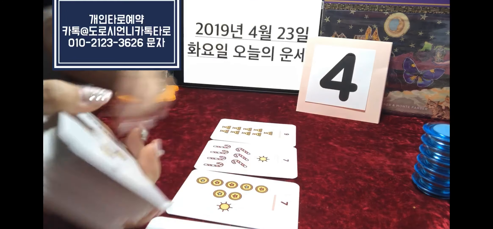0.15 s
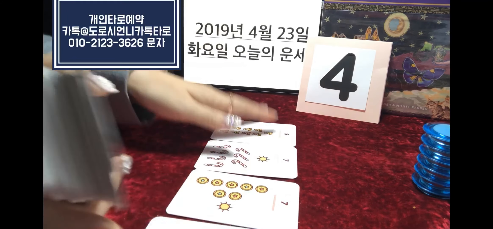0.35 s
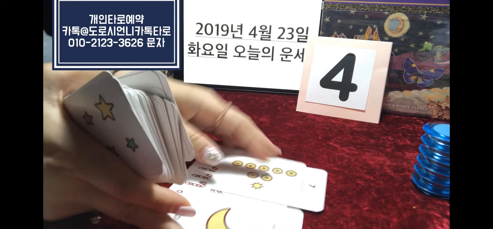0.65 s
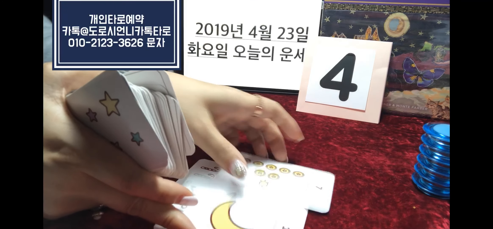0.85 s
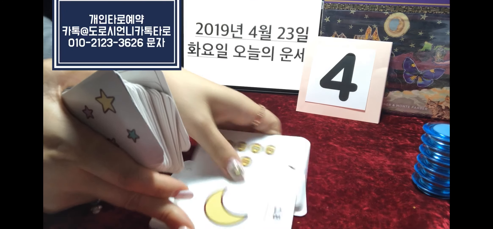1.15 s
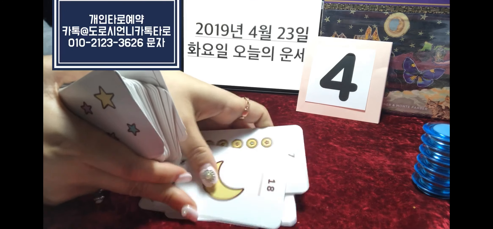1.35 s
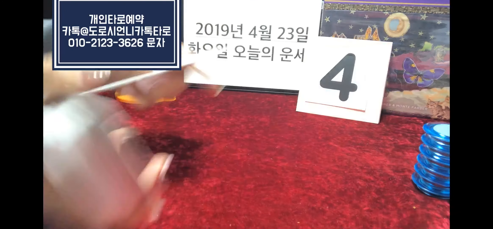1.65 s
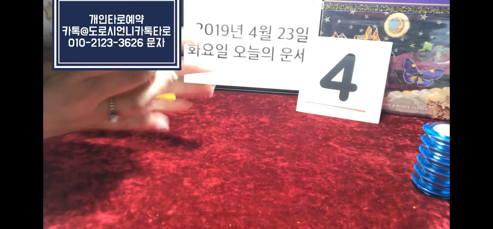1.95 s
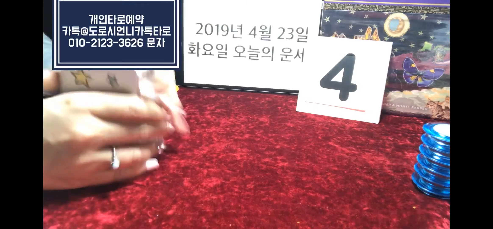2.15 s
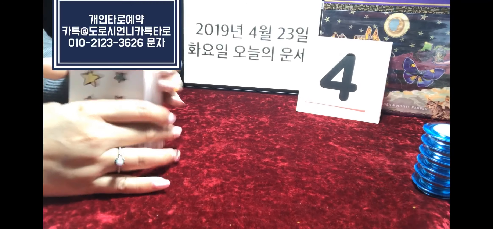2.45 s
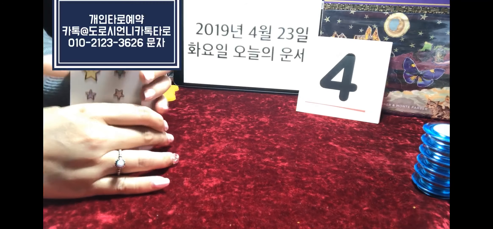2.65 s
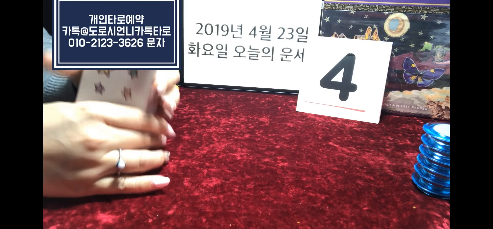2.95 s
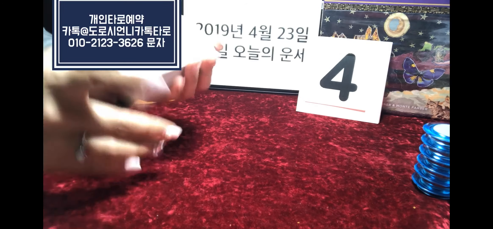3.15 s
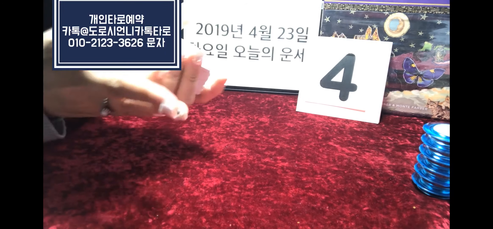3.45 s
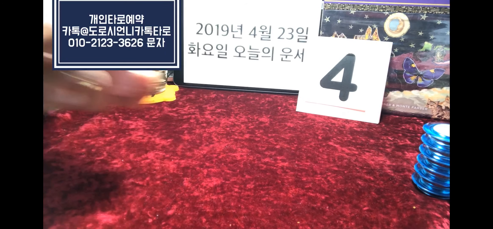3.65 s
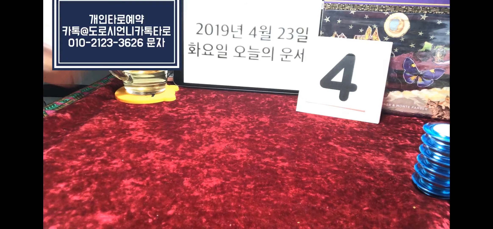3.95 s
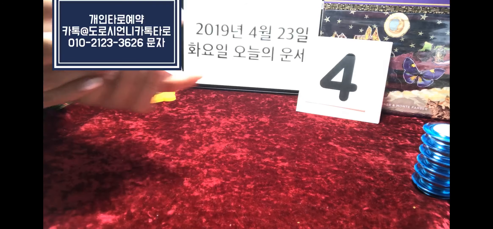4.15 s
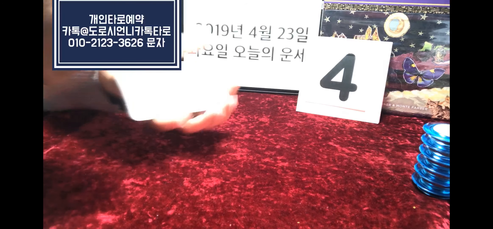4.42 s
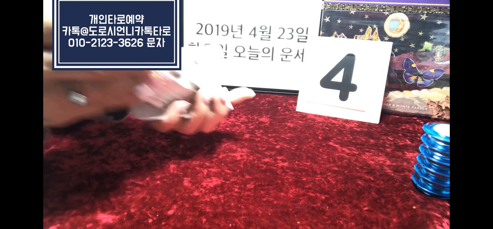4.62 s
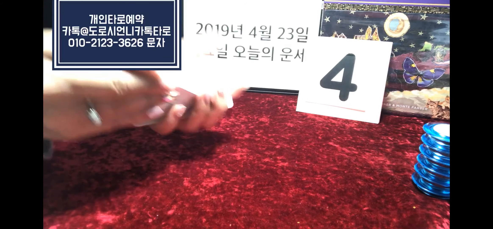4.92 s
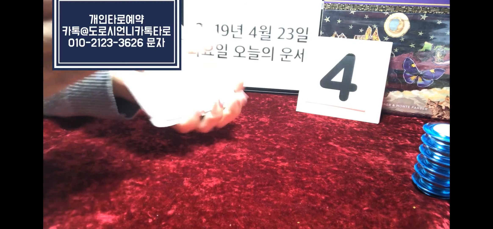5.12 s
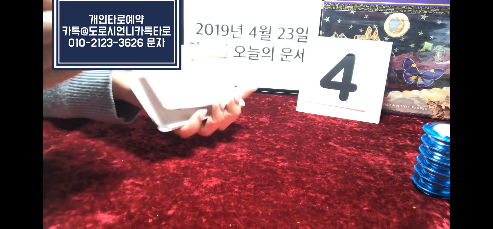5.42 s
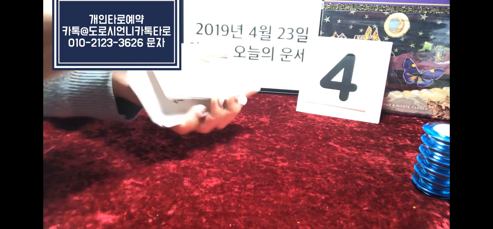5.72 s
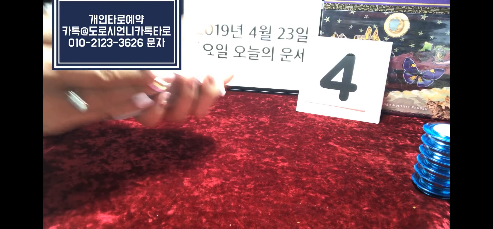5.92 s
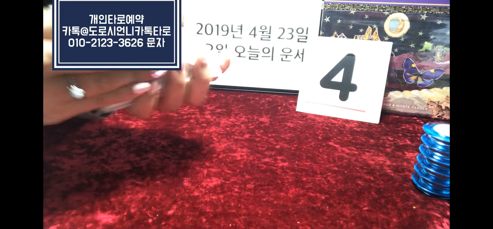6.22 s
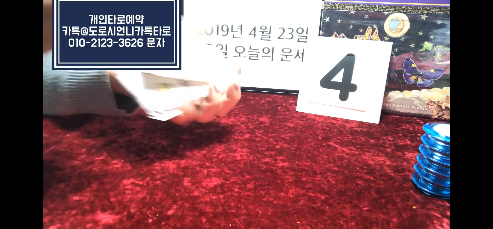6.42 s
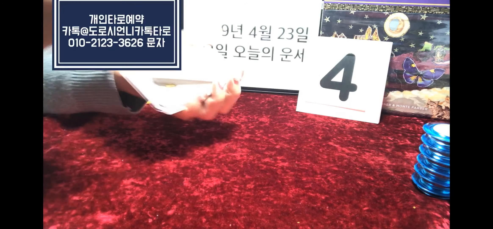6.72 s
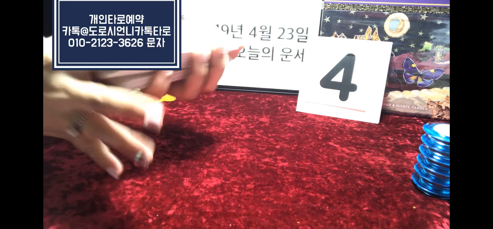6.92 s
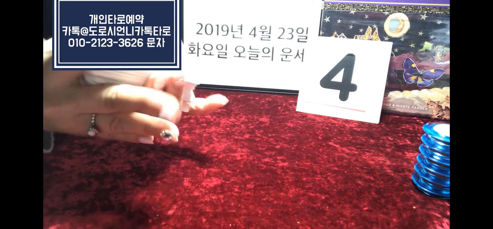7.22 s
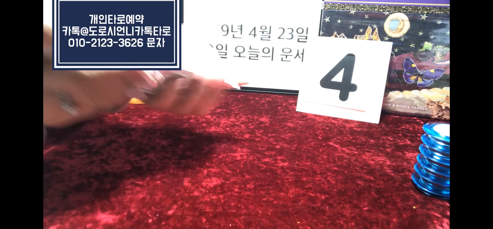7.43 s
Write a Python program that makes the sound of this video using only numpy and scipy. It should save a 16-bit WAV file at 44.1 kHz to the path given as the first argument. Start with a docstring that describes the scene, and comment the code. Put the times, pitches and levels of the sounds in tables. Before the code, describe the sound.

Close and dry, in a small quiet room with soft air and a faint low hum. At about 0.1 s a bright, hard card snap is followed by a tiny singing scrape and a hollow pop. From 0.5 to 1.1 s come light ticks, short slides and soft table bumps, with a quick bright swish at 1.04. Between 1.2 and 2.0 s cards are gathered with longer papery friction, crisp clicks near 1.58 and 1.86, and dull cloth rumble. Firm, woody knocks cluster at 2.15 s, loudest here, and again at 2.4, then softer thuds at 2.8 and 3.1. Faint rubbing fades into near silence until 4.6 s. Then eight overhand shuffle strokes land about every third of a second, the last at 6.9: brushy rush, hollow slap with softer rebound, sliding, light lifting tick. Strokes around 5.3 to 5.7 s are strongest. Only a faint slide remains near 7.5 s.

```python
"""Tarot cards gathered from a cloth-covered table, knocked on it, then shuffled overhand, all close by.
Cards: snapping edges and hollow pops are filtered impulses with dying noise; friction is grainy noise.
Eight shuffle strokes: a packet rushes in, lands, slides out and lifts clear with a tick of its edges.
Table: blows ring decaying modes, hands rumble on the cloth. Room echoes, still air and a low hum."""
import sys
import numpy as np
from scipy import signal
from scipy.fft import rfft, irfft
from scipy.io import wavfile
from scipy.ndimage import uniform_filter1d

SR = 44100
rng = np.random.default_rng(int(sys.argv[2]) if len(sys.argv) > 2 else 0)


def wav_out(sig):
    """Save sig, one row per channel (or a flat mono array), as 16-bit PCM at SR to the path in sys.argv[1]."""
    wavfile.write(sys.argv[1], SR, np.round(np.clip(np.atleast_2d(sig).T, -1, 1) * 32767).astype(np.int16))


N = 334278
TAPS = 8192
TIME_S, AGE_S, BINS_HZ = np.arange(N) / SR, np.arange(TAPS) / SR, np.fft.rfftfreq(TAPS, 1 / SR)

# Event levels precede the deck colour, layer gains, room and microphone; spectra are relative.
# still room air: freq_hz, gain_db
AIR_SPECTRUM = [(25, -26), (50, -19.5), (85, -17.5), (280, -18.5), (450, -21), (1300, -31.5), (3600, -35.5),
                (16000, -46)]
# card faces slide over each other: fastest_s, rise_s, fade_s, level_db, brightness_db_per_octave
SLIDES = [(.03, .025, 0.15, -58.5, -2), (.16, .05, 0.11, -59, -5.5), (.503, 0.018, 0.041, -54.5, 0),
          (.58, 0.062, 0.16, -55, 0.5), (.794, 0.075, 0.028, -54.5, -2.5), (.985, .015, 0.058, -59.5, -1.5),
          (1.038, 0.011, 0.021, -35, -2), (1.11, 0.088, 0.16, -51.5, -2.5), (1.386, 0.3, .18, -47.5, -3),
          (1.385, 0.044, .06, -49, -6), (1.58, 0.36, 0.12, -51.5, -1), (1.815, 0.079, 0.1, -49, -2),
          (2.054, .12, .12, -55, 0.5), (2.156, .012, .06, -45, -5), (2.169, 0.045, .11, -51.5, 5.5),
          (2.243, .04, 0.042, -54, 1.5), (2.41, 0.0105, 0.1, -54.5, 1.5), (2.57, 0.018, 0.13, -68.5, 0),
          (2.79, .02, 0.24, -71.5, 1), (3.167, 0.046, 0.24, -60.5, -3.8), (4.335, .11, 0.019, -55.5, 1.5),
          (4.501, 0.011, 0.04, -62, -0.5), (4.7, 0.045, 0.12, -55.5, -2), (4.83, 0.11, 0.18, -63, -4.5),
          (5.118, .05, .045, -49, 3.5), (5.457, .055, 0.024, -38, 9.5), (5.569, 0.071, 0.029, -52.5, -2),
          (6.841, .03, 0.046, -59.5, -1.5), (6.948, 0.0226, 0.026, -41.5, 2),
          (7.124, 0.021, 0.16, -54.5, 2), (7.552, 0.23, 0.027, -56.5, 2)]
# colour of face friction: freq_hz, gain_db
FACE_SPECTRUM = [(70, -5.5), (220, -2.5), (700, -4.5), (1080, -5.5), (1500, -3.5), (3200, -1.5),
                 (4400, 0.5), (6000, -4.5), (7500, -4.5), (9500, -10), (15500, -14)]
# colour of a card edge: freq_hz, gain_db
EDGE_SPECTRUM = [(150, -15.5), (500, -8.5), (1000, -9), (1550, 3.5), (2100, -3.5), (2700, 0.5), (3200, 1),
                 (3700, 4), (5300, 0.5), (6600, -4.5), (7600, -7), (10000, -18), (15500, -21.5)]
# card picked up or put down, its edge snaps and its face pushes out air:
# start_s, snap_db, brightness_db_per_octave, pop_db, pop_hz
CONTACTS = [(0.0886, -29.5, -0.5, -31, 760), (0.1062, -14.5, 2.5, -33, 798),
            (0.1478, -43, -6, -27.5, 528.7), (.266, -57.5, -3.5, -68, 700), (.4103, -55, -1, -60, 700),
            (0.4864, -55, -1, -73, 700), (0.5707, -33.5, 5, -68, 800), (.6467, -40.5, -2, -63, 700),
            (0.6521, -28, 1.5, -54, 760), (.802, -48.5, -3, -58, 450), (.873, -41, -1.5, -48, 680),
            (0.9697, -39, 4, -36.5, 800), (1.0506, -31.5, 1.2, -44, 770), (1.2269, -48, -4, -70, 600),
            (1.3695, -39, 12, -58, 450), (1.386, -43, -8, -48, 420), (1.4463, -43.5, -7.5, -54, 400),
            (1.574, -29, 8, -57, 700), (1.5835, -28.5, 7.5, -45.5, 530), (1.7145, -55.5, -3, -48, 665),
            (1.7881, -39.5, 2, -45.5, 368.6), (1.8507, -29, -3.5, -37, 674), (1.8667, -29, 3.5, -42.5, 585),
            (1.876, -34, 3.5, -37, 750), (2.001, -54, -8, -56, 600), (2.147, -49, -6, -34, 1234),
            (2.6454, -54.5, 8, -62, 500), (3.388, -50.5, 3.5, -61, 710), (4.8314, -72, -4, -50.5, 360),
            (4.9048, -44, 4.5, -51, 600), (5.2224, -55, -1, -51.5, 660), (5.557, -44.5, 3.5, -46.5, 614),
            (5.8193, -49.5, -9, -56, 700), (6.1082, -56, -7, -47, 300), (6.1352, -42, 2, -45.5, 490),
            (6.5595, -43.5, 2.5, -59, 600), (6.59, -44, -1, -54, 600), (6.6029, -30, -1, -40.5, 666),
            (6.6929, -43, 1, -53.5, 550), (6.812, -55, -3, -67, 603)]
# pop around its centre: frequency_ratio, gain_db
POP_SPECTRUM = [(.08, -25.5), (.25, -8.5), (.55, -1.5), (1, 3.5), (1.6, -1), (2.8, -21), (6, -42),
                (20, -62)]
# resonances of a card scraped off the table: center_hz, half_width_hz, gain_db
SCRAPE_MODES = [(1500, 900, -10), (2680, 280, -1.5), (3620, 280, -1.5), (5360, 2500, -0.5),
                (7110, 600, -9.5), (301.3, 82, -3.5)]
# course of the scrape: time_s, level_db
SCRAPE_LEVEL = [(.107, -41.5), (.111, -33), (.124, -36), (.132, -36), (.141, -33), (.148, -38.5),
                (.16, -45.5)]
# hands drag and press on the cloth: hardest_s, rise_s, fade_s, level_db
DRAGS = [(.2, .08, 0.097, -55.5), (.83, 0.13, .2, -51.5), (1.38, 0.14, 0.25, -46), (2.55, 0.5, .35, -60),
         (3.17, 0.086, 0.15, -53), (4.83, .25, .25, -57)]
# table under the hands: freq_hz, gain_db
CLOTH_SPECTRUM = [(50, -26.5), (100, -4.5), (150, 4), (220, -6), (330, -3), (600, -23), (1500, -28.5),
                  (4000, -45)]
# deck or hand meets the table, harder blows have a higher corner: start_s, level_db, corner_hz
KNOCKS = [(.502, -46, 198), (.973, -36.5, 340), (1.051, -33.5, 292), (1.509, -50, 285), (1.639, -51, 200),
          (2.135, -32, 380), (2.155, -18.5, 756), (2.172, -22, 640), (2.193, -29.5, 626),
          (2.245, -41.5, 313), (2.397, -28, 480), (2.413, -23.5, 540), (2.646, -48, 160),
          (2.795, -30.5, 200), (3.079, -41.5, 282)]
# modes of the table: freq_hz, gain_db, t60_s
TABLE_MODES = [(89.9, -21.5, 0.056), (121.2, 3, 0.13), (186.3, -10.5, 0.2), (260, -14, 0.072),
               (286, -1.5, 0.072), (392, -12.5, 0.084), (489.4, 4, 0.072), (533.5, -3.5, .1),
               (612, -0.5, 0.053), (714, 1.5, 0.097), (770, -5, 0.099), (942, -13, .05), (1142, -7, 0.11),
               (1360, -3, 0.077)]
# dull push of a blow on the table top: freq_hz, gain_db
PUSH_SPECTRUM = [(40, -31.5), (75, -8), (120, 1.5), (230, -8), (290, 0), (410, -13.5), (520, -0.5),
                 (950, -12), (1600, -5), (3000, -17.5)]
# overhand strokes: landing_s, rush_lead_s, rush_db, snap_db, brightness_db_per_octave,
# pop_db, pop_hz, draw_length_s, draw_db, lift_s, lift_db
STROKES = [(4.61, .006, -41, -29, 1, -33.5, 855, .01, -52.5, 4.803, -49.5),
           (4.962, .002, -36.5, -31, -4.5, -31, 490, 0.11, -54.5, 5.1676, -38),
           (5.325, .0085, -33, -23.5, 2, -23.5, 675, 0.063, -50, 5.5009, -35),
           (5.6573, 0.0038, -29.5, -21, -2, -26, 750, 0.079, -53.5, 5.8815, -45),
           (5.9715, .008, -31.5, -30, -6, -28, 515, 0.075, -51.5, 6.1672, -36.5),
           (6.2892, .007, -35, -29.5, 0.5, -28.5, 694, .07, -52, 6.454, -37),
           (6.6133, .011, -37.5, -30, -1, -34.5, 478, 0.028, -52, 6.762, -43),
           (6.9224, .013, -38.5, -28, 1, -31, 505, 0.006, -68.5, 7.0043, -53)]
# colour of the edges in a rush: freq_hz, gain_db
BRUSH_SPECTRUM = [(150, 5.5), (500, 5.5), (900, -1.5), (1700, -1), (2800, -3), (4500, -1), (7300, -7.5),
                  (9500, -11), (15500, -14)]
# fixed bands lifted in every card sound: center_hz, half_width_hz, boost_db
CARD_BANDS = [(362.2, 45, 2.5), (717.3, 17, 3.5), (850, 70, 3.5), (1460, 130, 3.5), (2170, 37, 0.5),
              (3650, 350, -1.5)]
# decay of the small room: freq_hz, t60_s
ROOM_DECAY = [(100, 0.32), (500, 0.18), (3000, 0.31), (8000, 0.22), (16000, 0.16)]

AIR_DB = -67.5
SWELL_DB = 20  # span of one rise or fade
# a harder snap is more of a single crack: dB less shiver per dB above the threshold
CRACK_FROM_DB, CRACK_SHARPENING = -26.5, 0.6
# a hard blow claps the cards together: level re blow, pop per corner, corner below which it fades
CLAP_DB, CLAP_PITCH_RATIO, CLAP_HARD_HZ, CLAP_DELAY_S = -4.5, 1.25, 380, .0025
RUSH_OVERLAP_S = .011  # edges keep brushing after the landing
# the far end lands later, softer and duller
REBOUND_S, REBOUND_DB, REBOUND_PITCH_RATIO, REBOUND_DB_PER_OCTAVE = 0.0082, -9, 0.71, -5
SETTLE_DB, SETTLE_S, SETTLE_FADE_S = -13, 0.013, .05  # packet beds in; level re rush
# thumb pulls cards off
DRAW_DELAY_S, DRAW_RISE_S, DRAW_FADE_S, DRAW_DB_PER_OCTAVE = 0.072, .09, 0.053, 2.6
GRIP_DELAY_S, GRIP_DB, GRIP_HZ = .105, -57.5, 520  # fingers close on the packet
LIFT_DB_PER_OCTAVE, LIFT_POP_DB, LIFT_POP_HZ = 0.44, -5, 575  # pop level re lift tick
CUT_HZ = 16000


def amp(db):
    """Decibels to gain."""
    return 10 ** (np.asarray(db) / 20)


def unit(x):
    """Scales to rms 1."""
    return x / np.sqrt(np.mean(x ** 2) + 1e-20)


def at_level(x, db, size):
    """Sets the rms of the first size samples."""
    return amp(db) * x / np.sqrt(np.mean(x[:size] ** 2))


def read(points, hz):
    """Joins points by straight lines over log frequency."""
    point_hz, value = np.transpose(points)
    return np.interp(np.log(hz + 1), np.log(point_hz), value)


def octaves(hz):
    """Distance from the middle of the cards' range, for tilting a colour."""
    return np.log2(np.clip(hz, 700, 11000) / 3800)


def add(mix, start_s, sound):
    """Mixes a sound in at start_s."""
    part = mix[max(round(start_s * SR), 0):][:len(sound)]
    part += sound[:len(part)]


def colour(x, gain_db):
    """Minimum-phase filter with gain_db over BINS_HZ, peak gain normalized to 0 dB."""
    log_gain = np.log(amp(np.maximum(gain_db - gain_db.max(), -90)))
    mirrored = np.r_[log_gain, log_gain[-2:0:-1]]
    spectrum = np.exp(signal.hilbert(mirrored).conj())
    return signal.fftconvolve(x, np.fft.ifft(spectrum).real)[:len(x)]


def ripple(spacing_hz):
    """Random spectral peaks and dips: a card bends differently in every grip."""
    knots_hz = np.arange(0, SR / 2 + spacing_hz, spacing_hz)
    return np.interp(BINS_HZ, knots_hz, rng.standard_normal(TAPS)[:len(knots_hz)])


def patches(z, bin_count, frame_count):
    """Random blotches of rms 1 over frequency and time."""
    blotches = uniform_filter1d(rng.standard_normal(z.shape), bin_count, axis=0)
    return unit(uniform_filter1d(blotches, frame_count, axis=1))


def blow(t60_s, scatter_db):
    """One impulse plus a dying scatter of small contacts."""
    x = rng.standard_normal(TAPS) * amp(-60 * AGE_S / t60_s)
    x *= amp(scatter_db) / np.linalg.norm(x)
    x[0] += 1
    return x


def grains(size, per_s, spread_db, hiss):
    """Paper fibres catch and let go: clicks of uneven size over a fine hiss."""
    sizes_db = spread_db * np.minimum(rng.exponential(1, size), 4)
    catches = (rng.random(size) < per_s / SR) * amp(sizes_db)
    clicks = unit(catches * rng.choice([-1, 1], size))
    return unit(clicks + hiss * rng.standard_normal(size))


def swell(peak_s, rise_s, fade_s, level_db, hold_s=0):
    """Power of a hand movement that gathers speed until peak_s, holds, and dies away."""
    before = np.maximum(peak_s - TIME_S, 0) / rise_s
    after = np.maximum(TIME_S - peak_s - hold_s, 0) / fade_s
    return amp(level_db - SWELL_DB * np.minimum(before + after, 10)) ** 2


def background():
    """Still room air as shaped noise; low appliance hum as a sine with drifting phase."""
    hz = np.fft.rfftfreq(N, 1 / SR)
    z = rfft(rng.standard_normal(N)) * amp(read(AIR_SPECTRUM, hz))
    air = irfft(z, N) / np.std(irfft(z * (hz > 100), N))  # rms 1 above 100 Hz
    drift = unit(irfft(rfft(rng.standard_normal(N)) * np.exp(-(hz / 3) ** 2), N))
    hum = amp(-65.5) * np.sin(2 * np.pi * 57.8 * TIME_S + .25 * drift)
    return amp(AIR_DB) * air + hum


def edge_ticks(per_s=28, tick_db=3):
    """Single edges slip off the packet at random moments; level is relative to the friction."""
    out = np.zeros(N)
    for when, softness, dullness in rng.random((round(per_s * N / SR), 3)):
        shape_db = read(EDGE_SPECTRUM, BINS_HZ) - 4 * dullness * octaves(BINS_HZ)
        shape_db += 3 * ripple(spacing_hz=387)
        tick = colour(blow(t60_s=0.0092, scatter_db=2.5), shape_db)
        add(out, when * N / SR, at_level(tick, tick_db - 12 * softness, size=176))
    return out


def slide(rubs, patch_db=2.0, bend_db=1.5):
    """Friction of card on card, its colour flickering with the grip and drifting as the cards bend."""
    power = sum(p for p, _ in rubs)
    db_per_octave = sum(p * tilt for p, tilt in rubs) / power
    fibres = grains(N, per_s=2500, spread_db=3.1, hiss=.7)
    hz, t_s, z = signal.stft(fibres, SR, nperseg=256)
    uneven_db = patch_db * patches(z, bin_count=3, frame_count=5)
    uneven_db += bend_db * patches(z, bin_count=6, frame_count=22)
    tilt_db = np.outer(octaves(hz), np.interp(t_s, TIME_S, db_per_octave))
    gain = amp(read(FACE_SPECTRUM, hz)[:, None] + tilt_db + uneven_db)
    gain /= np.sqrt(np.mean(gain ** 2, axis=0))
    rub = signal.istft(z * gain, SR, nperseg=256)[1][:N]
    grip_db = 3.2 * unit(uniform_filter1d(rng.standard_normal(N), size=200))
    return (unit(rub) * amp(grip_db) + edge_ticks()) * np.sqrt(power)


def snaps(edges, ripple_db=3.0, shiver_db=5.5):
    """A bent edge lets go and the card shivers for a few milliseconds."""
    out = np.zeros(N)
    for start_s, level_db, db_per_octave in edges:
        shape_db = read(EDGE_SPECTRUM, BINS_HZ) + db_per_octave * octaves(BINS_HZ)
        shape_db += ripple_db * ripple(spacing_hz=335.5)
        scatter_db = shiver_db - CRACK_SHARPENING * max(level_db - CRACK_FROM_DB, 0)
        snap = colour(blow(t60_s=0.014, scatter_db=scatter_db), shape_db)
        add(out, start_s, at_level(snap, level_db, size=176))
    return out


def pats(pops, ripple_db=2.5):
    """Air pushed out by a card face: a hollow pop in a band around its pitch."""
    out = np.zeros(N)
    ratio, gain_db = np.transpose(POP_SPECTRUM)
    for start_s, level_db, pop_hz in pops:
        band_db = np.interp(np.log((BINS_HZ + 1) / pop_hz), np.log(ratio), gain_db)
        band_db += ripple_db * ripple(spacing_hz=129.1)
        pop = colour(blow(t60_s=0.036, scatter_db=0.5), band_db)
        add(out, start_s, at_level(pop, level_db, size=352))
    return out


def scrape():
    """One card edge drags: grainy friction sings briefly through resonances."""
    gain = sum(amp(db) / (1 + ((BINS_HZ - hz) / width_hz) ** 2) for hz, width_hz, db in SCRAPE_MODES)
    song = colour(grains(N, per_s=1800, spread_db=1.5, hiss=0.44), 20 * np.log10(gain))
    level_db = np.interp(TIME_S, *np.transpose(SCRAPE_LEVEL), left=-120, right=-120)
    return unit(song) * amp(level_db)


def drag(lump_db=5.5):
    """Uneven rubbing on the cloth makes the table top rumble softly, in lumps."""
    lumps = unit(uniform_filter1d(rng.standard_normal(N), size=1200))
    rumble = unit(colour(rng.standard_normal(N), read(CLOTH_SPECTRUM, BINS_HZ)))
    power = sum(swell(*row) for row in DRAGS)
    return rumble * np.sqrt(power) * amp(lump_db * lumps)


def knocks(push_db=4, push_t60_s=0.022, steep_db=17):
    """Each blow pushes the table top and rings its modes; the cloth takes away the treble."""
    out = np.zeros(N)
    for start_s, level_db, corner_hz in KNOCKS:
        ring = np.zeros(TAPS)
        for hz, gain_db, t60_s in TABLE_MODES:
            mode = amp(gain_db - 60 * AGE_S / t60_s) * np.cos(2 * np.pi * hz * AGE_S)
            ring += mode * rng.choice([-1, 1])
        push = colour(blow(t60_s=push_t60_s, scatter_db=1.0), read(PUSH_SPECTRUM, BINS_HZ))
        thud = ring / np.linalg.norm(ring) + amp(push_db) * push / np.linalg.norm(push)
        soft_db = -steep_db * np.log10(1 + (BINS_HZ / corner_hz) ** 4)
        add(out, start_s, at_level(colour(thud, soft_db), level_db, size=970))
    return out


def rushes(brushes, release_s=0.0062):
    """A dense burst of edge clicks as a packet pushes into the deck."""
    out = np.zeros(N)
    for start_s, length_s, level_db in brushes:
        shape = amp(-60 * np.maximum(AGE_S - length_s, 0) / release_s)
        clicks = grains(TAPS, per_s=2500, spread_db=-4.5, hiss=0.76)
        burst = unit(colour(clicks, read(BRUSH_SPECTRUM, BINS_HZ)))
        add(out, start_s, amp(level_db) * shape * burst)
    return out


def gestures():
    """Breaks the hands' work into edge snaps, air pops, rushes and spells of friction."""
    edges = [(s, db, tilt) for s, db, tilt, _, _ in CONTACTS]
    pops = [(s, db, hz) for s, _, _, db, hz in CONTACTS]
    for s, db, corner_hz in KNOCKS:
        clap_db = db + CLAP_DB - 10 * np.log10(1 + (CLAP_HARD_HZ / corner_hz) ** 10)
        pops.append((s + CLAP_DELAY_S, clap_db, CLAP_PITCH_RATIO * corner_hz))
    rubs = [(swell(s, rise_s, fade_s, db), tilt) for s, rise_s, fade_s, db, tilt in SLIDES]
    brushes = []
    for s, lead_s, rush_db, snap_db, tilt, pop_db, pop_hz, draw_s, draw_db, lift_s, lift_db in STROKES:
        brushes.append((s - lead_s, lead_s + RUSH_OVERLAP_S, rush_db))
        edges += [(s, snap_db, tilt),
                  (s + REBOUND_S, snap_db + REBOUND_DB, tilt + REBOUND_DB_PER_OCTAVE),
                  (lift_s, lift_db, LIFT_DB_PER_OCTAVE)]
        pops += [(s, pop_db, pop_hz),
                 (s + REBOUND_S, pop_db + REBOUND_DB, pop_hz * REBOUND_PITCH_RATIO),
                 (s + GRIP_DELAY_S, GRIP_DB, GRIP_HZ),
                 (lift_s, lift_db + LIFT_POP_DB, LIFT_POP_HZ)]
        settle = swell(s + SETTLE_S, SETTLE_S / 2, SETTLE_FADE_S, rush_db + SETTLE_DB)
        draw = swell(s + DRAW_DELAY_S, DRAW_RISE_S, DRAW_FADE_S, draw_db, draw_s)
        rubs += [(settle, 0), (draw, DRAW_DB_PER_OCTAVE)]
    return edges, pops, brushes, rubs


def room(x, far_db, near_db=-15, near_t60_s=0.046):
    """Quick sparse reflections, then a faint room tail whose decay depends on frequency."""
    t_s = np.arange(SR // 2) / SR
    near, far = rng.standard_normal((2, len(t_s))) * (rng.random((2, len(t_s))) < 3000 / SR)
    near = near * (t_s > .0015) * amp(-60 * t_s / near_t60_s)
    hz, age_s, z = signal.stft(far * (t_s > .008), SR, nperseg=256)
    decay = amp(-60 * age_s / read(ROOM_DECAY, hz)[:, None])
    far = signal.istft(z * decay, SR, nperseg=256)[1][:len(t_s)]
    echo = amp(near_db) * near / np.linalg.norm(near) + amp(far_db) * far / np.linalg.norm(far)
    return x + signal.fftconvolve(x, echo)[:N]


def scene():
    """Cards and table in the room."""
    edges, pops, brushes, rubs = gestures()
    cards = slide(rubs) + amp(-0.5) * snaps(edges) + amp(-3.0) * pats(pops)
    cards += amp(-1.5) * scrape() + amp(-0.5) * rushes(brushes)
    bands_db = sum(db / (1 + ((BINS_HZ - hz) / width_hz) ** 2) for hz, width_hz, db in CARD_BANDS)
    cards = colour(cards, bands_db)
    table = amp(-4.5) * drag() + amp(-1.0) * knocks()
    mix = background() + room(amp(4.5) * cards, far_db=-19.0) + room(table, far_db=-24.5)
    return mix[None]


def record(dry):
    """The microphone drops the deepest bass and lets the lows lag behind the treble; then its band limit."""
    hz = np.fft.rfftfreq(2 * N, 1 / SR)
    lag_s = .019 / (1 + (hz / 185) ** 1.5)
    phase = -2 * np.pi * np.cumsum(lag_s) * hz[1]  # integral of group delay
    late = irfft(rfft(dry, 2 * N) * np.exp(1j * phase), 2 * N)[:, :N]
    thin = signal.sosfilt(signal.butter(5, 51, "highpass", fs=SR, output="sos"), late)
    band_limit = signal.firwin(511, CUT_HZ, window=("kaiser", 9), fs=SR)
    return signal.oaconvolve(thin, band_limit[None], "same")


dry = scene()
out = record(dry)
wav_out(out)
```